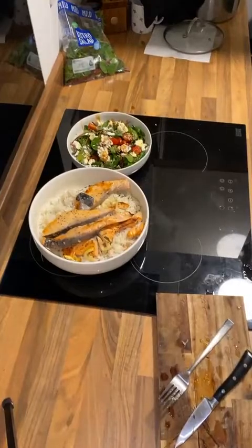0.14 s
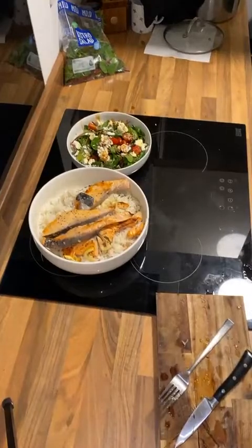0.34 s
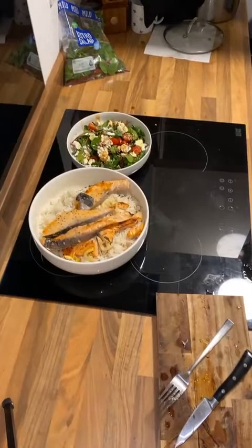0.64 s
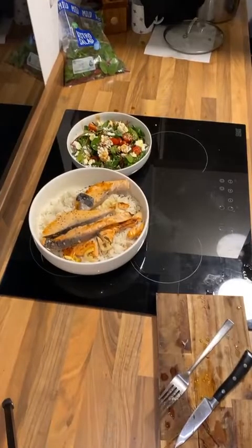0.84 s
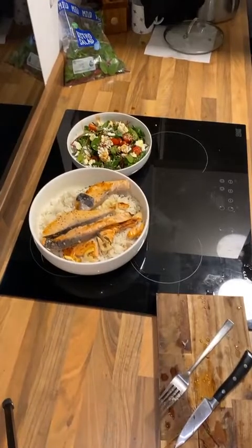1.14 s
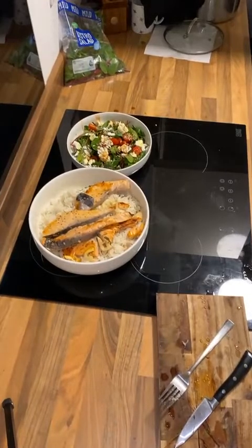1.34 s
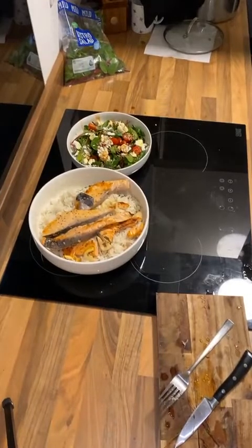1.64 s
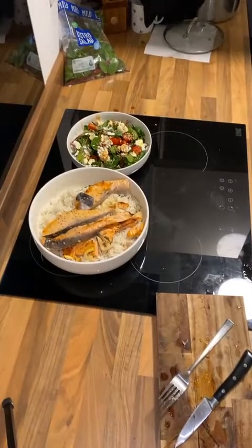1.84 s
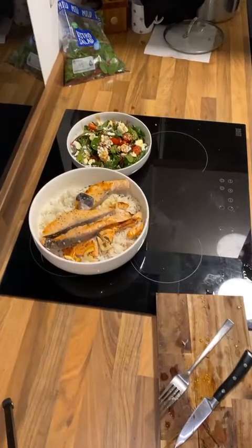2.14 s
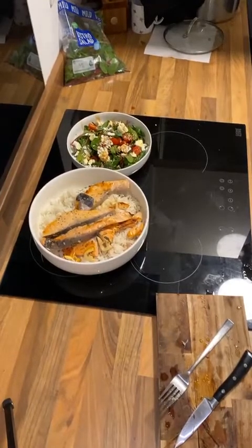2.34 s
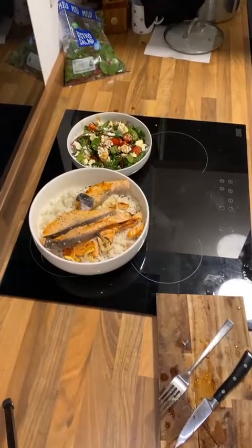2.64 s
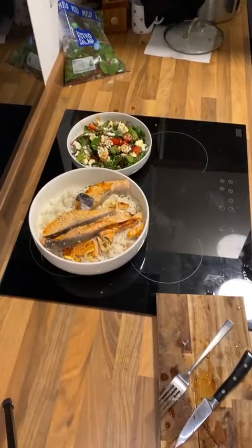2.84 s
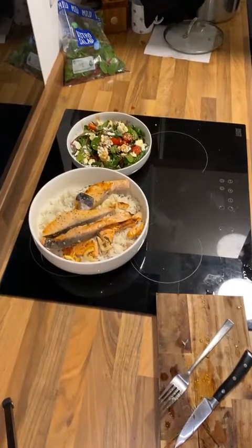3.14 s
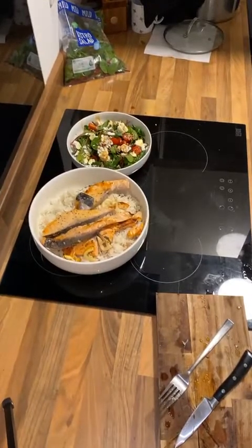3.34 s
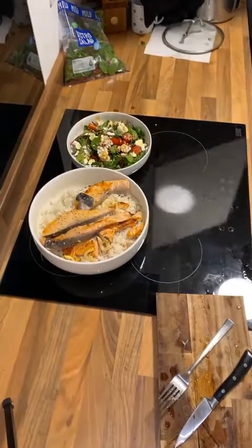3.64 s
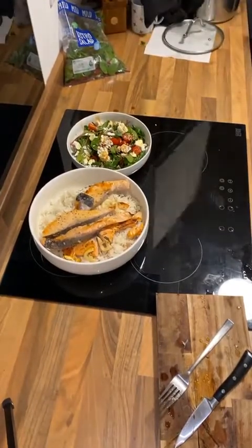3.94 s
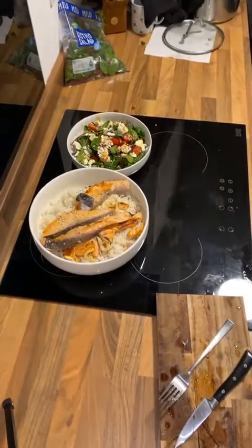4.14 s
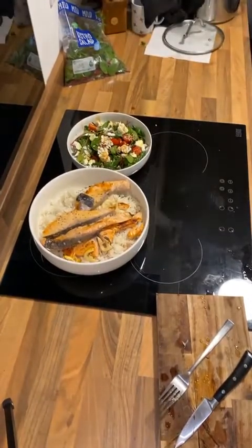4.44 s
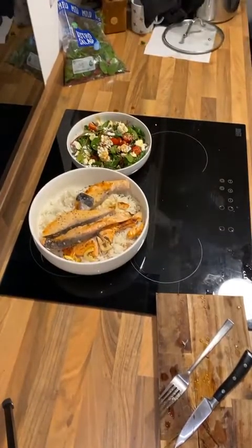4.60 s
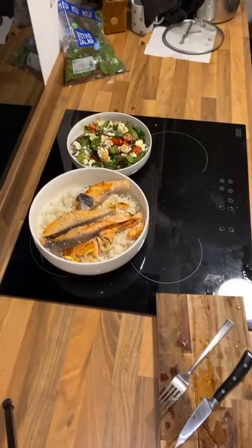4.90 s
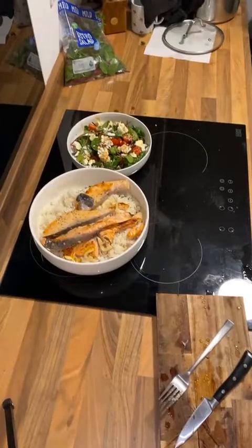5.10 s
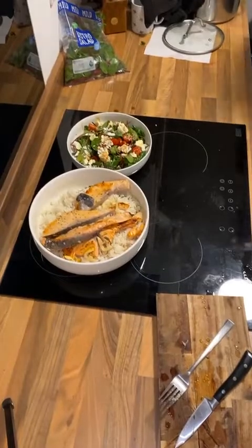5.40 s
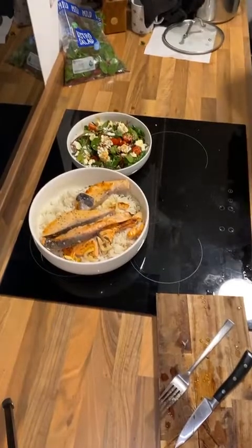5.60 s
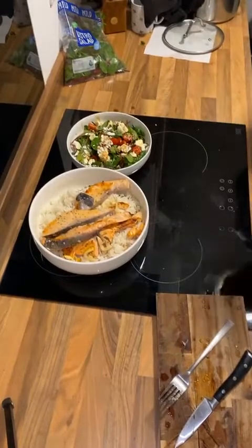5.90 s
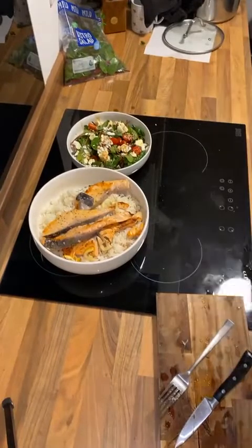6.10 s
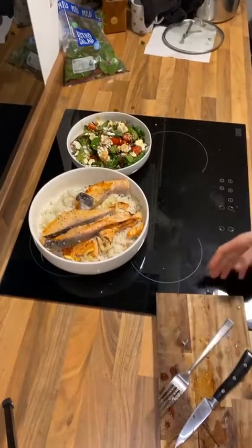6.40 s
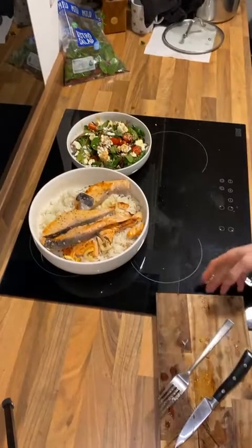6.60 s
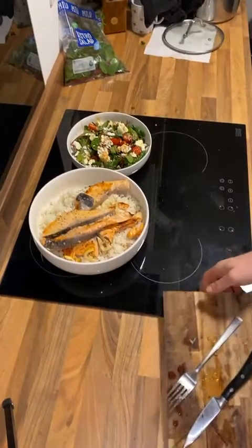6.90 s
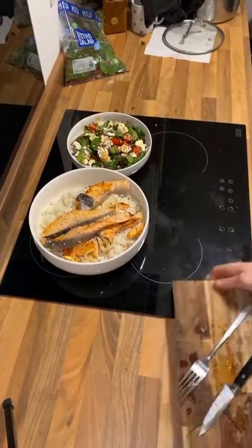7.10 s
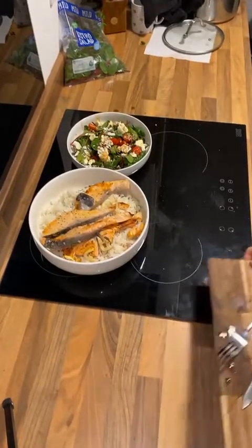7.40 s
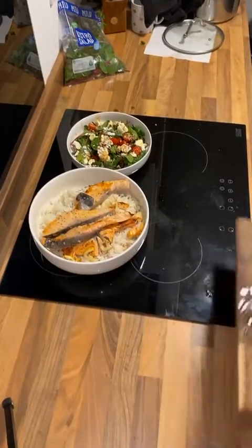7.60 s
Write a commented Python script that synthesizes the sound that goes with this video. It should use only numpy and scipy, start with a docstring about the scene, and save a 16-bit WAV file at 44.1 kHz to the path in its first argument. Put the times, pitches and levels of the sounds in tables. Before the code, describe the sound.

Cutlery and glass jingle, then heavy cupboard knocks and a plate clink in a humming kitchen, ending with cloth rustle and a wooden board scraping.

```python
"""A home kitchen over a refrigerator's wavering hum lines and wash of air. Cutlery and glass jingle first.
From 2.4 s cupboard doors and heavy things knock: noise bursts, flapping panels and ringing modes.
A plate clinks twice at 2.8 s, as beating mode pairs; the hardest knocks fall at 4.4 and 5.1 s.
From 4.9 s cloth rustles as roughened hiss; near 7 s a wooden board scrapes off the worktop and
squeaks by stick and slip, before a last faint knock. A small hard room answers each hit."""
import sys
import numpy as np
from scipy import signal
from scipy.fft import rfft, irfft
from scipy.io import wavfile
from scipy.ndimage import uniform_filter1d

SR = 44100
rng = np.random.default_rng(int(sys.argv[2]) if len(sys.argv) > 2 else 0)


def natural_amplitude(level_db):
    """Convert a level in decibels to a linear amplitude factor, elementwise."""
    exponent = np.asarray(level_db, float) / 20
    return 10 ** exponent


def generate_wav(signal):
    """Clip the signal to [-1, 1] and save it as 16-bit WAV at the path in sys.argv[1]."""
    frames = np.transpose(np.atleast_2d(signal))
    scaled = np.clip(frames, -1, 1) * 32767
    pcm = np.round(scaled).astype(np.int16)
    wavfile.write(sys.argv[1], SR, pcm)


N = 341775


def unit_rms(x):
    """Scales x to rms 1."""
    return x / np.sqrt(np.mean(x ** 2) + 1e-20)


def read(points, hz):
    """Reads a curve along log frequency."""
    f, value = np.transpose(points)
    return np.interp(np.log(hz + 1), np.log(f + 1), value)


def add(mix, start_s, sound, peak_db):
    """Adds a sound at a given peak."""
    part = mix[round(start_s * SR):][:len(sound)]
    part += natural_amplitude(peak_db) * sound[:len(part)] / abs(sound).max()


def coloured(x, points, tilt_db=0):
    """Shapes x by a spectrum, tilted in dB per octave about 1.5 kHz."""
    hz = np.fft.rfftfreq(len(x), 1 / SR)
    gain_db = read(points, hz) + tilt_db * np.log2((hz + 100) / 1500)
    return irfft(rfft(x) * natural_amplitude(gain_db), len(x))


def resonate(x, hz, width_hz):
    """A resonance of gain 1 at hz."""
    pole = np.exp((2j * np.pi * hz - np.pi * width_hz) / SR)
    return 2 * signal.lfilter([1 - abs(pole)], [1, -pole], x).real


def body(x, modes):
    """A body's resonances, alternate ones in opposite phase."""
    return sum((-1) ** k * natural_amplitude(db) * resonate(x, hz, width_hz)
               for k, (hz, width_hz, db) in enumerate(modes))


def burst(x, t60_s, rise_s):
    """x with a quick rise and an exponential fall."""
    t = np.arange(len(x)) / SR
    return x * (1 - np.exp(-t / rise_s)) * natural_amplitude(-60 * t / t60_s)


def stroke(start_s, db, hold_s, t60_s, rise_s):
    """Gain of one stroke: it rises, holds and dies away."""
    t = np.clip(np.arange(N) / SR - start_s, 0, None)
    return (1 - np.exp(-t / rise_s)) * natural_amplitude(db - 60 * np.clip(t - hold_s, 0, None) / t60_s)


def rubbing(slips_per_s, spread_db):
    """Friction: a hiss roughened by tiny slips, uneven in size where spread_db > 0."""
    size = natural_amplitude(spread_db * np.minimum(rng.exponential(1, N), 4))
    slips = size * (rng.random(N) < slips_per_s / SR)
    roughness = signal.lfilter([1], [1, -.99], slips)
    return unit_rms(rng.standard_normal(N) * (1 + roughness))


# room decay: f/Hz, t60/s
ROOM_DECAY = [(100, 0.59), (300, 0.3), (1000, 0.43), (3000, 0.36), (8000, 0.31), (16000, 0.42)]


def room(x):
    """Echoes of random sign, one in every 8 samples, each band dying at its own speed."""
    taps = np.zeros(SR)
    at = np.arange(200, SR - 8, 8)
    taps[at + rng.integers(0, 8, len(at))] = rng.choice([-1., 1.], len(at))
    hz, t, bands = signal.stft(taps, SR, nperseg=256)
    decay = natural_amplitude(-60 * t / read(ROOM_DECAY, hz)[:, None])
    tail = signal.istft(bands * decay, SR, nperseg=256)[1]
    return signal.fftconvolve(x, tail / np.linalg.norm(tail))[:N]


# air wash, relative spectrum: f/Hz, level/dB
AIR_COLOUR = [(20, -25), (53, -24.5), (65, -19.5), (90, -5.5), (168, -10), (228, -20.5), (262, -10.5),
              (328, -18), (450, -15.5), (1100, -26), (1700, -25.5), (2600, -30.5), (8000, -39),
              (10000, -46), (16000, -53.5)]
# hum lines: f/Hz, rms level/dB (line near 100 Hz: before its swell), fuzz width/Hz
HUM_LINES = [(39.9, -64, 2.2), (79, -53, 4.85), (99.6, -55, 3.6), (114.7, -61, 3.9), (269, -64, 4.2),
             (1643, -73.5, 12), (1827, -75.5, 10)]
# swell of the mains line near 100 Hz: t/s, gain/dB
MAINS_SWELL = [(0, -15.5), (5.4, 8), (6.5, 1), (7.75, 1.5)]


def fridge():
    """Compressor lines that waver, over a steady wash of air."""
    t = np.arange(N) / SR
    swell = natural_amplitude(np.interp(t, *np.transpose(MAINS_SWELL)))
    out = natural_amplitude(-55) * unit_rms(coloured(rng.standard_normal(N), AIR_COLOUR))
    for hz, db, width_hz in HUM_LINES:
        fuzz = unit_rms(resonate(resonate(rng.standard_normal(N), hz, width_hz), hz, width_hz))
        tone = np.sin(2 * np.pi * (hz * t + rng.random()))
        line = natural_amplitude(db) * unit_rms(tone + 0.56 * fuzz)
        out += line * (swell if 95 < hz < 106 else 1)
    return out


# cloth strokes: t/s, level/dB, hold/s, t60/s
RUSTLES = [(4.86, -53.5, 0.028, 0.65), (5.392, -55, .12, 0.6), (5.637, -54, 0.028, 1.66),
           (5.824, -59.5, 0.019, 0.86), (6.356, -69, 0.28, 0.43), (6.612, -61.5, 0.035, 0.49)]
# relative spectrum of cloth, also of the jingles' chatter: f/Hz, level/dB
RUSTLE_COLOUR = [(800, -4), (2000, -0.5), (3500, 3), (6200, 3.5), (10000, -2.5), (16000, -10)]


def rustle():
    """Cloth and slippers move about: strokes of roughened hiss."""
    moves = sum(stroke(*row, rise_s=0.025) for row in RUSTLES)
    return unit_rms(coloured(rubbing(slips_per_s=920, spread_db=0), RUSTLE_COLOUR)) * moves


NUDGE_RISE_S = 0.0041
# board nudged over the worktop: t/s, level/dB, hold/s, t60/s, tilt/(dB/octave)
NUDGES = [(6.818, -59.5, 0.032, 0.08, 0.5), (6.98, -57, 0.15, 0.18, -3), (7.079, -56, 0.036, 0.04, 6),
          (7.157, -43.5, 0.013, 0.07, -5), (7.178, -52, 0.0085, 0.1, 0)]
# board resonances: f/Hz, width/Hz, level/dB
BOARD_MODES = [(272, 5.9, 8), (718, 31, 3.5), (920, 160, -1), (1900, 190, -7), (2500, 28, 3),
               (2800, 100, 0)]
# relative spectrum of hard contact, also of plate and knocks: f/Hz, level/dB
KNOCK_COLOUR = [(100, -14.5), (200, -1.5), (400, -1.5), (800, -2.5), (1550, -1), (2200, -3), (3100, -6),
                (4500, -13.5), (8000, -22.5), (11000, -44), (16000, -47)]


def slide():
    """The board is dragged over the worktop: friction drives its resonances."""
    rub = rubbing(slips_per_s=250, spread_db=4)
    drive = 0
    for *row, tilt_db in NUDGES:
        scrape = coloured(rub, KNOCK_COLOUR, tilt_db)
        drive = drive + scrape * stroke(*row, NUDGE_RISE_S) / np.std(body(scrape, BOARD_MODES))
    return body(drive, BOARD_MODES) + natural_amplitude(-11) * drive


# board squeaks: t/s, level/dB, hold/s, t60/s
SQUEAKS = [(7.063, -47.5, .065, 0.03)]


def squeak():
    """Stick and slip at a rising, unsteady rate: a short rough stack of harmonics."""
    start_hz, rise_hz_per_s, jitter_share = 915, 700, .04
    harmonic_db_per_octave, uneven_db = -11, 7.5
    out = np.zeros(N)
    for row in SQUEAKS:
        t = np.clip(np.arange(N) / SR - row[0], 0, 1)
        wobble = jitter_share * unit_rms(uniform_filter1d(rng.standard_normal(N), size=200))
        turns = np.cumsum((start_hz + rise_hz_per_s * t) * (1 + wobble)) / SR
        slips = sum(natural_amplitude(harmonic_db_per_octave * np.log2(k)) * np.cos(2 * np.pi * k * turns)
                    for k in range(1, 8))
        uneven = natural_amplitude(uneven_db * unit_rms(uniform_filter1d(rng.standard_normal(N), size=300)))
        out += unit_rms(slips * uneven) * stroke(*row, NUDGE_RISE_S)
    return out


# jingles: t/s, peak level/dB, low centre f/Hz, high centre f/Hz, chatter t60/s
JINGLES = [(.001, -30.5, 2800, 7600, 0.14), (0.121, -31.5, 2700, 5700, 0.29),
           (0.253, -43, 2930, 1670, 0.33), (0.323, -49, 7350, 5100, 0.22), (.389, -48, 2720, 6100, 0.28),
           (.462, -48, 2050, 3100, 0.23), (.972, -43.5, 3670, 3900, 0.14), (3.22, -58, 6070, 8900, .19),
           (4.031, -30.5, 4530, 8500, 0.092), (6.432, -46, 3520, 6300, 0.083),
           (6.494, -41, 3750, 5400, 0.11)]
# cutlery and glass resonances: f/Hz, width/Hz, level/dB
CUTLERY_MODES = [(1910, 830, 10.5), (2700, 570, 2.5), (2973, 216, 6), (3700, 350, 0.5), (4100, 83, -1),
                 (4690, 91, -1.5), (5760, 210, -1.5), (6780, 180, -10), (7730, 150, 0.5), (9300, 140, -1)]


def jingles(mix):
    """Small metal and glass things touch: short chatter through the resonances near two centres."""
    for start_s, db, low_hz, high_hz, t60_s in JINGLES:
        chatter = burst(coloured(rng.standard_normal(SR // 2), RUSTLE_COLOUR), t60_s, rise_s=.002)
        near = []
        for hz, width_hz, mode_db in CUTLERY_MODES:
            octaves_off = min(abs(np.log2(hz / low_hz)), abs(np.log2(hz / high_hz)))
            near.append((hz, width_hz, mode_db - 30 * octaves_off))
        blur = resonate(chatter, low_hz, 0.18 * low_hz) - resonate(chatter, high_hz, 0.33 * high_hz)
        add(mix, start_s, body(chatter, near) + natural_amplitude(-8) * blur + natural_amplitude(-17) * chatter, db)


# plate touches: t/s, peak level/dB
PLATE_TAPS = [(2.831, -27.5), (2.85, -24.5)]
# plate modes: f/Hz, level/dB, t60/s
PLATE_MODES = [(1763, 2.5, 0.33), (2830, 6, 0.17), (3120, -4, 0.38), (4520, -1.5, 0.3), (4920, 2.5, 0.18),
               (5170, -3, 0.17), (6410, -5, 0.2), (6690, -4, 0.22), (7900, -13, 0.17), (9300, -14, .14),
               (11400, -21, .18), (11860, -18, 0.18), (14800, -22, 0.15)]


def plate(mix):
    """A plate touches its stack twice; its modes are close pairs that beat, roughened by chatter."""
    t = np.arange(SR // 2) / SR
    for start_s, db in PLATE_TAPS:
        contact = coloured(rng.standard_normal(len(t)), KNOCK_COLOUR, tilt_db=-2.0)
        ring = natural_amplitude(13.5) * burst(contact, t60_s=0.11, rise_s=0.0018)
        for hz, mode_db, t60_s in PLATE_MODES:
            a, b = 2 * np.pi * rng.random(2)
            pair = np.sin(2 * np.pi * hz * t + a) + natural_amplitude(-3.5) * np.sin(2 * np.pi * (hz - 32) * t + b)
            chatter = unit_rms(resonate(rng.standard_normal(len(t)), hz, .04 * hz))
            rough = natural_amplitude(-5) * burst(chatter, t60_s=0.17, rise_s=0.005)
            ring += natural_amplitude(mode_db) * (burst(pair, t60_s, rise_s=0.0046) + rough)
        add(mix, start_s, ring, db)


def flap(t, hz, length_s):
    """A panel flaps unevenly a few times and stops."""
    shudder = unit_rms(resonate(resonate(rng.standard_normal(len(t)), hz, hz), hz, hz))
    arch = np.sin(np.pi * np.clip(t / length_s, 0, 1))
    return arch * (np.sin(2 * np.pi * hz * t) + hz / 650 * shudder)


# weight behind a contact: t/s, peak level/dB, flap f/Hz, length/s, overtone level/dB
THUMPS = [(2.437, -10.5, 131, 0.032, 0.5), (2.77, -27.5, 129, 0.039, -2), (2.918, -28.5, 152, 0.0304, -7),
          (3.383, -25.5, 129, 0.047, 1.5), (3.601, -27, 118.4, 0.072, -12.5), (3.659, -39, 121, 0.058, -21),
          (3.814, -34.5, 127.8, 0.077, 14), (4.366, -10, 117.7, 0.031, -3.5),
          (4.736, -16.5, 113.7, 0.042, -9), (4.871, -29.5, 114, 0.068, -24),
          (5.094, -12.5, 112, 0.039, -19), (5.15, -9.5, 128.5, 0.079, -10.5),
          (5.432, -27, 120.3, 0.072, -22.5), (6.893, -38.5, 137, 0.021, 13)]
# cabinet and floor modes: f/Hz, level/dB, ring/s (1.6 / bandwidth in Hz)
CABINET_MODES = [(63.5, 14, 0.69), (87, 15.5, 0.12), (110, 5.5, 0.19), (127.4, -2.5, 0.11),
                 (164, 7.5, 0.08), (178, 10.5, 1), (268.5, -28, 0.53), (324, -4, 0.553), (366, 1, 0.27),
                 (435, 1, 0.45)]


def thumps(mix):
    """A shove and a panel flapping with one overtone; the cabinet's modes ring on."""
    overtone_ratio = 2.1
    t = np.arange(SR // 2) / SR
    shove = np.sin(np.pi * np.clip(t / 0.0086, 0, 1)) ** 2
    modes = [(hz, 1.6 / ring_s, db) for hz, db, ring_s in CABINET_MODES]
    for start_s, db, hz, length_s, over_db in THUMPS:
        overtone = natural_amplitude(over_db) * flap(t, overtone_ratio * hz, length_s)
        push = flap(t, hz, length_s) + overtone + natural_amplitude(-8.0) * shove
        add(mix, start_s, push + natural_amplitude(-3.5) * body(push, modes), db)


# hardest contacts: t/s, peak level/dB, pitch ratio (larger panel = lower), t60/s, rise/s
CRACKS = [(2.354, -29.5, .66, .1, 0.0046), (2.444, -17, .3, .13, .005), (4.3645, -5, 1.001, .075, 0.0014),
          (4.721, -21, .81, .1, 0.0031), (5.087, -7, 1.06, .1, 0.0028)]
# wooden panel modes at pitch ratio 1: f/Hz, level/dB
DOOR_MODES = [(765, -7.5), (1080, -9.5), (1490, 2.5), (1860, -3.5), (2110, -4), (2580, -8.5)]


def cracks(mix):
    """A struck panel rings briefly; its modes are part clean, part rattling."""
    blur_share = 0.035  # rattle bandwidth / mode pitch
    t = np.arange(SR // 2) / SR
    for start_s, db, ratio, t60_s, rise_s in CRACKS:
        ring = 0
        for door_hz, mode_db in DOOR_MODES:
            hz = door_hz * ratio
            rattle = unit_rms(resonate(rng.standard_normal(len(t)), hz, blur_share * hz))
            clean = np.sin(2 * np.pi * (hz * t + rng.random()))
            ring = ring + natural_amplitude(mode_db) * (clean + natural_amplitude(-4.5) * rattle)
        add(mix, start_s, burst(ring, t60_s, rise_s), db)


# hard contacts on wood: t/s, peak level/dB, tilt/(dB/octave), rise/s, t60/s
KNOCKS = [(2.352, -21, -3.5, 0.0079, 0.29), (2.439, -13.5, -4, 0.017, 0.14),
          (2.754, -31.5, -5.5, 0.029, 0.28), (2.922, -32.5, -8.5, 0.007, 0.13),
          (3.383, -47, 6, 0.0038, 0.083), (3.586, -41, -2, 0.0053, 0.43), (4.364, -5.5, -0.5, 0.0092, 0.2),
          (4.72, -16.5, -1.5, 0.011, 0.16), (4.866, -32.5, -6, 0.01, 0.26), (5.086, -7, -1.8, 0.014, 0.16),
          (5.149, -18.5, 10, 0.0094, 0.18), (5.418, -34, 0, 0.0022, 0.23),
          (7.647, -45.5, -6, 0.0015, 0.037)]


def knocks(mix):
    """A rattling contact: a broad burst of noise roughened by slips."""
    rattle = rubbing(slips_per_s=200, spread_db=0)
    for start_s, db, tilt_db, rise_s, t60_s in KNOCKS:
        excerpt = np.roll(rattle, -rng.integers(N))[:SR // 2]
        grain = coloured(excerpt, KNOCK_COLOUR, tilt_db)
        add(mix, start_s, burst(grain, t60_s, rise_s), db)


def scene():
    """Hits and weight excite the room at separate levels; the fridge stays dry."""
    hits, weight = np.zeros((2, N))
    knocks(hits)
    cracks(weight)
    plate(hits)
    jingles(hits)
    thumps(weight)
    hits += rustle() + slide() + squeak()
    echoes = natural_amplitude(-6) * room(hits) + natural_amplitude(-10.5) * room(weight)
    return (hits + weight + echoes + fridge())[None]


def low_pass(x):
    """Removes everything above the highest recorded frequency."""
    return signal.sosfilt(signal.butter(12, 15760, fs=SR, output="sos"), x)


def record(dry):
    """The small microphone drops the deepest bass."""
    thin = signal.sosfilt(signal.butter(2, 45, "high", fs=SR, output="sos"), dry)
    return low_pass(thin)


dry = scene()
out = record(dry)
generate_wav(out)
```